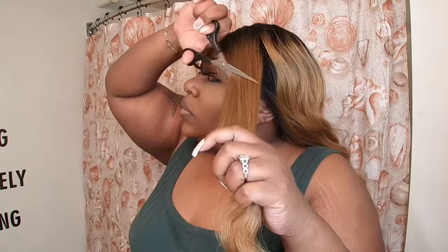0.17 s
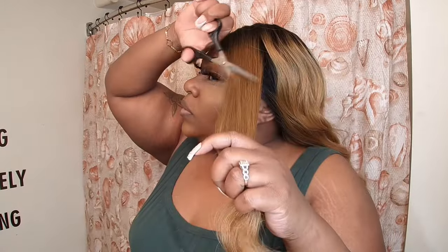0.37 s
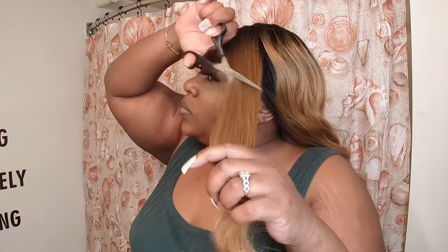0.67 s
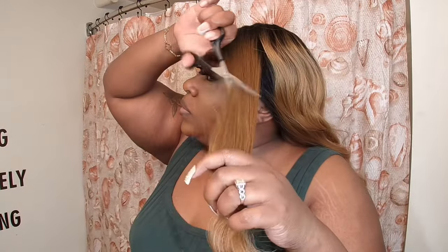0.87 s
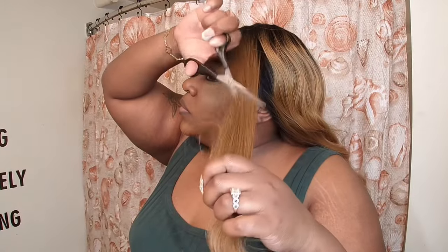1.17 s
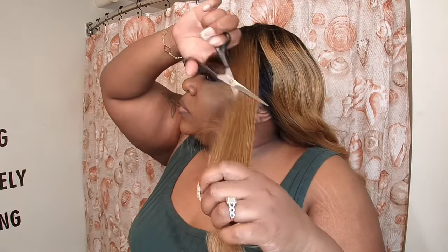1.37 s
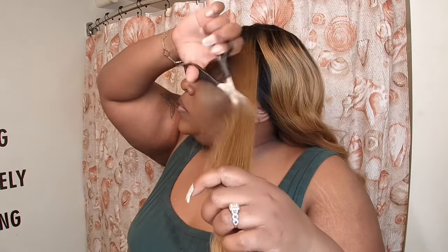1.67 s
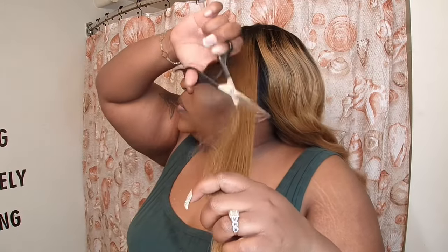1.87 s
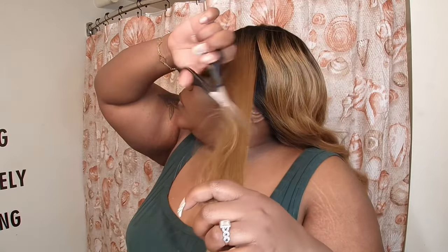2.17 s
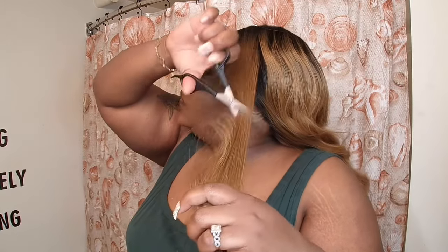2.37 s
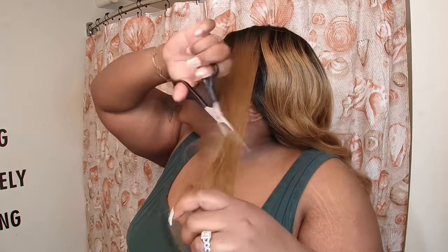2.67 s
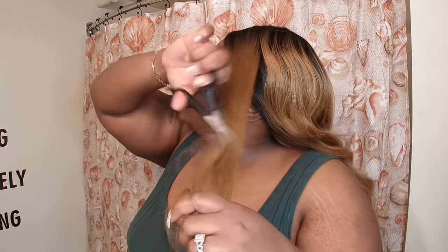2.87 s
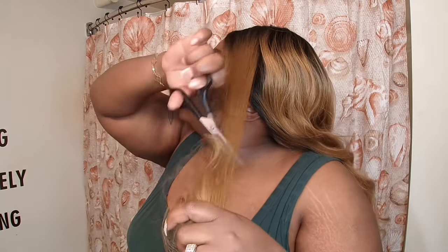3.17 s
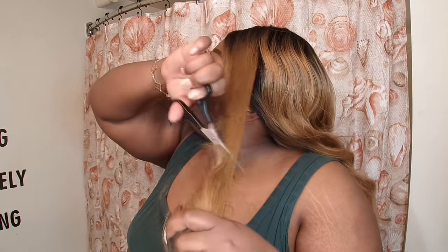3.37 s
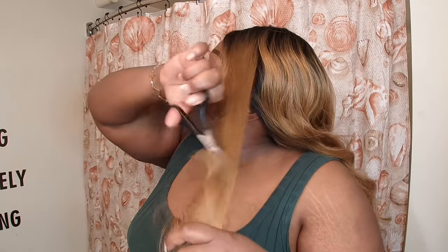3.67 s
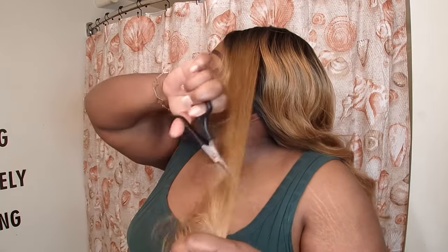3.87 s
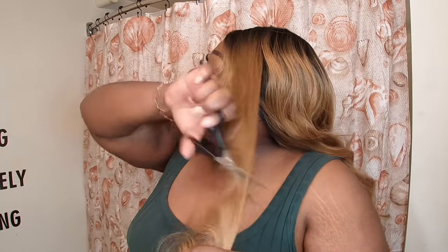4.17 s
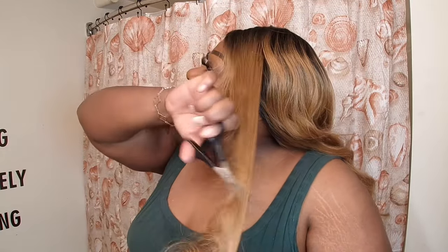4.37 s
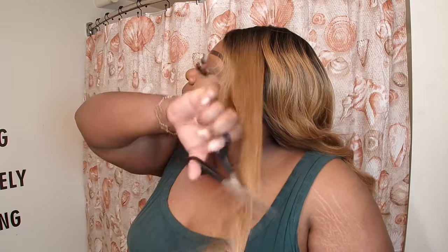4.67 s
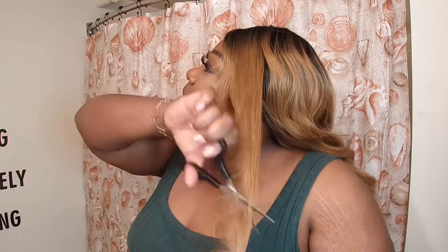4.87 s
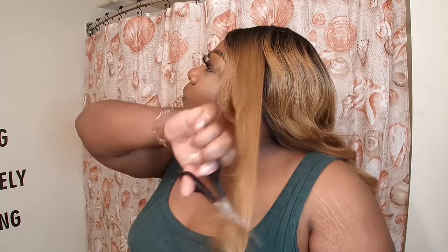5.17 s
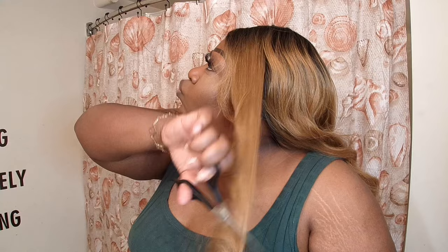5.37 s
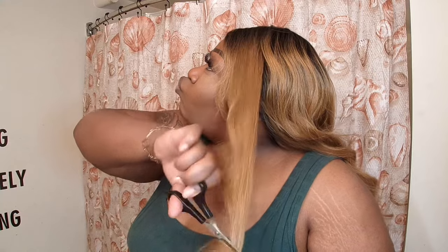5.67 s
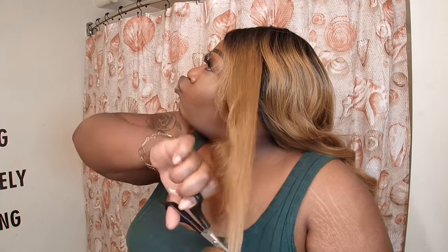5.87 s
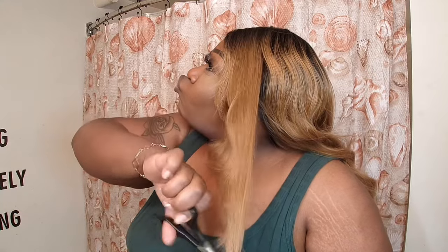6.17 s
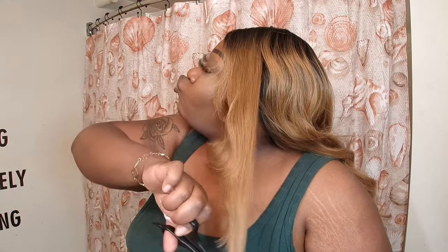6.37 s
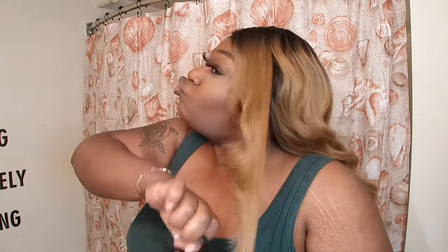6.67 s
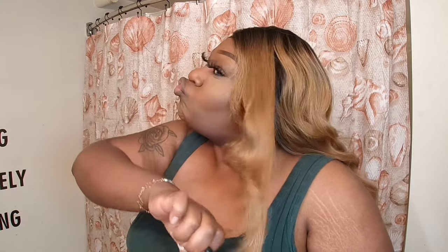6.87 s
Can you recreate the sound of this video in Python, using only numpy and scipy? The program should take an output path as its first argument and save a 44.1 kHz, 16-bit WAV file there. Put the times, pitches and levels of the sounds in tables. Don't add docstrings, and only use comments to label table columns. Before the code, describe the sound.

Close to the microphone in a small hard-walled bathroom, scissors cut down a hank of synthetic hair. From 0.2 s, light strokes come about every quarter second, each under a tenth of a second: a soft, bright, sizzling shear with thin steely ring around eight to nine kilohertz. The first are almost buried; by 2 s they are clear, and from 4 to 5.8 s crispest. At 5.87-5.95 s the blades snag with sharp ticks, a short scrape and a tiny squeak, while snipping continues. At 6.3-6.45 s comes the loudest, gritty rasp with low tugging body and squeaks; another catch and rasp follow at 6.53 s, then a swelling scrape with small squeaks from 6.65 to 6.85 s. A faint snip closes at 6.93 s. Steady microphone hiss, weak mains hum, a wavering low motor drone and barely audible distant thuds lie beneath.

```python
import sys
import numpy as np
from scipy import signal
from scipy.fft import rfft, irfft, next_fast_len
from scipy.io import wavfile

SR = 44100
rng = np.random.default_rng(int(sys.argv[2]) if len(sys.argv) > 2 else 0)


def undo_db(level):
    steps = np.asarray(level, float) / 20
    return 10 ** steps


def materialize(psi):
    bounded = np.clip(np.atleast_2d(psi).T, -1, 1)
    quanta = np.round(bounded * 32767).astype(np.int16)
    wavfile.write(sys.argv[1], SR, quanta)


N = 308848
TIME = np.arange(N) / SR

# frequency in Hz, density in dB per Hz.
HISS_SPECTRUM = [(21, -45), (35, -9), (73, -9), (88, -5), (108, -10.5), (129, -13), (184, -16.5),
                 (237, -17.5), (298, -19.5), (348, -20), (1150, -28), (3630, -36.5), (8880, -38),
                 (15600, -39)]
# frequency in Hz, level in dB rms.
MAINS_HARMONICS = [(60, -50.5), (180, -59), (300, -67)]
# start in seconds, frequency in Hz, level in dB, length in seconds.
FAR_THUDS = [
    (.31, 82, -45, .12),
    (2.83, 80, -44, .11),
    (4.49, 345, -63, .06),
    (4.86, 240, -60, .17),
    (4.83, 290, -62, .05),
    (5.89, 365, -57, .05),
]

# start in seconds, peak in dB, T60 in seconds.
CATCH_TICKS = [
    (5.63, -57, 0.023),
    (5.867, -41, 0.039),
    (5.895, -33, 0.038),
    (5.903, -22.5, 0.036),
    (6.301, -46, 0.046),
    (6.527, -33, 0.058),
]
# frequency in Hz, density in dB per Hz.
CATCH_SPECTRUM = [(250, -2.5), (500, 2), (1500, 0), (2200, 3), (3500, -29), (6000, -21), (9000, 5.5),
                  (12000, -19), (16000, -35)]

# start in seconds, length in seconds,
# first and last frequency in Hz, fundamental in dB.
SOFT_SLIPS = [(5.868, 0.017, 1750, 1810, -48), (5.904, 0.051, 1447, 1250, -41.5),
              (5.983, 0.044, 1300, 1352, -51.5), (6.479, .05, 1050, 920, -52.5),
              (6.309, 0.021, 1120, 1120, -48), (6.44, 0.043, 844, 770, -50.5),
              (6.667, 0.019, 1880, 1810, -38), (6.696, 0.031, 1400, 1310, -35.5)]
FIRM_SLIPS = [(6.303, 0.0052, 2180, 2100, -37.5), (6.54, 0.044, 1770, 1400, -50.5),
              (6.72, 0.016, 1680, 1690, -38), (6.737, 0.041, 1706, 1800, -38)]
HARD_SLIPS = [(6.324, 0.038, 1103, 1062, -43.5), (6.38, 0.04, 1103, 1064, -50.5),
              (6.59, 0.064, 1397, 1323, -63), (6.778, 0.0234, 1770, 1693, -54)]
# frequency in Hz, gain in dB.
SQUEAK_OVERTONES = [(1500, 3), (2500, 1), (3500, -2), (4500, 3.5), (5500, 0), (7000, 7.5), (8500, -11),
                    (10000, -17), (12000, -27)]

# top in seconds, level in dB,
# then attack, hold and release in seconds.
DRAG_STROKES = [(5.866, -44.5, .003, 0.011, .025), (5.903, -38.5, 0.02, 0.036, 0.058),
                (6.018, -51, .06, .005, .04), (6.302, -43, .005, .02, .02), (6.332, -30, 0.011, .01, .03),
                (6.347, -25.5, 0.02, 0.045, 0.06), (6.51, -51, .08, 0.0034, .01),
                (6.534, -32, 0.0087, 0.0057, .03), (6.549, -32, 0.044, .008, 0.096),
                (6.651, -35.5, 0.15, .003, 0.072), (6.74, -43, .05, 0.022, .05),
                (6.803, -38.5, 0.11, 0.022, .05)]
# top in seconds, level in dB, hold in seconds, hand relative in dB.
LOCK_TUGS = [(5.867, -53, .02, -26), (5.899, -39.5, .003, -6), (5.942, -52.5, 0.091, -8.5),
             (6.314, -38.5, 0.053, -15.5), (6.383, -40, 0.053, -8.5), (6.466, -50.5, 0.044, -3.5),
             (6.506, -41.5, .005, -20), (6.533, -43, .005, -34), (6.645, -48, 0.022, -33),
             (6.68, -43, .01, -16), (6.724, -52.5, 0.03, -6)]
# time in seconds, blades relative in dB.
BLADE_SLIDE = [
    (5.85, -16),
    (6.0, -13),
    (6.35, -42),
    (6.5, -25),
    (6.62, -7),
    (6.8, -17),
]
# frequency in Hz, density in dB per Hz.
RASP_SPECTRUM = [(1290, -27), (2200, -12), (2490, -11), (3230, -8.5), (3660, -13.5), (4290, -4.5),
                 (4970, -2.5), (5460, 2), (7960, 5.5), (10100, -0.5), (12500, -45), (16200, -55),
                 (22000, -120)]
EDGE_SPECTRUM = [(9000, -40), (11000, 7), (13000, -3), (15800, -11), (18000, -14)]
# frequency in Hz, width in Hz, level in dB.
LOCK_MODES = [(1050, 440, 1.5), (1400, 260, 8.5), (1970, 230, 4.5), (2760, 130, 2.5), (3460, 980, -11.5)]
HAND_MODES = [(348, 167, 0), (527, 185, 4), (773, 350, 3.5)]

# start in seconds, length in seconds, shear in dB, blade ring relative in dB.
SNIP_STROKES = [(0.188, 0.061, -67.5, -14.3), (0.45, 0.086, -66.5, -16), (0.708, 0.062, -64.5, -10),
                (0.94, 0.066, -61, -10), (1.18, 0.081, -58.5, -18), (1.422, 0.075, -56, -12.5),
                (1.657, 0.076, -55, -12), (1.902, 0.067, -53, -10.5), (2.137, 0.077, -54, -12),
                (2.376, 0.081, -53.5, -9.5), (2.612, 0.076, -54, -10.5), (2.837, 0.074, -54, -8.5),
                (3.073, 0.076, -54.5, -5), (3.318, 0.071, -52, -6), (3.544, 0.084, -53, -7),
                (3.78, 0.074, -52, -3.5), (4.016, 0.069, -50.5, -7.5), (4.246, 0.064, -52.2, -8),
                (4.472, 0.073, -49.5, -8), (4.7, 0.08, -49.5, -10), (4.93, 0.076, -50, -10.5),
                (5.156, 0.074, -48.5, -10), (5.385, 0.069, -50.5, -9), (5.623, 0.053, -48.5, -7.5),
                (5.837, 0.071, -49, -7.5), (6.062, 0.055, -49, -9), (6.281, 0.044, -48, -16),
                (6.925, 0.059, -58.5, -12)]
# time in seconds, heel and tip relative in dB.
CUT_PLACE = [
    (0, 4, -14),
    (1.5, -2, -24),
    (3, 0, -6),
    (4.6, -4, -11),
    (5.5, -10.5, -10),
    (7, -5, -18),
]
# frequency in Hz, width in Hz, level in dB.
BLADE_MODES = [(7800, 420, -9), (8050, 260, 13.5), (8156, 560, 16.5), (8560, 120, -16), (9060, 520, 16),
               (9680, 400, -8)]
RING_MODES = [(2230, 1430, -2.5), (2640, 300, 6), (3920, 5900, -24.5)]
HEEL_MODES = [(6410, 450, -3.5), (6800, 320, 3), (6990, 230, -16), (5320, 1150, -8)]
TIP_MODES = [(9330, 360, 10), (10550, 1300, 2), (11300, 1000, -17), (12600, 2900, 2)]
HANDLE_MODES = [(1315, 240, 1.5), (694, 57, 6.5)]
# frequency in Hz, density in dB per Hz.
SHEAR_SPECTRUM = [(1500, -35), (3000, -8.5), (5000, -5), (6500, -4.5), (8700, 7.5), (10200, -24),
                  (12000, -6), (14000, -27), (16000, -22)]


def rms_one(x):
    return x / np.sqrt(np.mean(x ** 2) + 1e-20)


def at_hz(points, hz):
    point_hz, point_db = np.array(points)[:, 0], np.array(points)[:, 1]
    return np.interp(np.log(hz + 1), np.log(point_hz), point_db)


def colour(x, points):
    size = next_fast_len(N)
    gain = undo_db(at_hz(points, np.fft.rfftfreq(size, 1 / SR)))
    return rms_one(irfft(rfft(x, size) * gain, size)[:N])


def drift(rate_hz):
    r = np.exp(-40 * np.pi * rate_hz / SR)
    noise = rng.standard_normal(N // 20 + 2002)
    slow = signal.lfilter([1], [1, -2 * r, r * r], noise)[2000:]
    return np.interp(np.arange(N) / 20, np.arange(len(slow)), rms_one(slow))


def resonate(x, modes, patchy_db=0):
    out = 0
    for k, (hz, width, db) in enumerate(modes):
        r = np.exp(-np.pi * width / SR)
        poles = [1, -2 * r * np.cos(2 * np.pi * hz / SR), r * r]
        rung = signal.lfilter([(1 - r * r) / 2, 0, (r * r - 1) / 2], poles, x)
        out = out + (-1) ** k * undo_db(db + patchy_db * drift(6.9)) * rung
    return out


def fibres(per_s, spread_db):
    sizes = undo_db(spread_db * np.minimum(rng.exponential(1, N), 4)) * rng.standard_normal(N)
    return rms_one(sizes * (rng.random(N) < per_s / SR))


def hump(start, length, top):
    top = np.clip(top, .05, .95)
    corners = [start, start + top * length, start + length]
    return np.sin(np.pi / 2 * np.interp(TIME, corners, [0, 1, 0]))


def swell(top, db, attack, hold, release, sag_db):
    attack, hold, release = np.maximum([attack, hold, release], .001)
    low = db - sag_db * hold
    corners = [top - 3 * attack, top, top + hold, top + hold + 3 * release]
    return undo_db(2 * np.interp(TIME, corners, [db - 60, db, low, low - 60], left=-200, right=-200))


def air_hiss():
    hiss = colour(rng.standard_normal(N), HISS_SPECTRUM)
    above_rumble = signal.butter(2, 320, "high", fs=SR, output="sos")
    hiss = undo_db(-60.5) * hiss / np.std(signal.sosfilt(above_rumble, hiss))
    return hiss * undo_db(0.25 * drift(0.93))


def mains_hum():
    return sum(undo_db(db + 2) * np.sin(2 * np.pi * hz * TIME + 6 * rng.random())
               for hz, db in MAINS_HARMONICS)


def motor_drone():
    level = undo_db(-48 + 2.1 * drift(3.9))
    hz = 27.2 + 0.67 * drift(1.7)
    return level * np.sin(2 * np.pi * np.cumsum(hz) / SR)


def thuds():
    return sum(undo_db(db + 3.0) * hump(s, length, 0.33) * np.sin(2 * np.pi * hz * TIME)
               for s, hz, db, length in FAR_THUDS)


def background():
    return air_hiss() + mains_hum() + motor_drone() + thuds()


def bathroom(x):
    t60_s, tail_db = 0.19, -7
    t = np.arange(int(.4 * SR)) / SR
    dull_noise = signal.lfilter([1], [1, -.3], rng.standard_normal(len(t)))
    tail = dull_noise * undo_db(-60 * t / t60_s) * (t > .003)
    return undo_db(tail_db) * signal.fftconvolve(x, tail / np.sqrt(np.sum(tail ** 2)))[:N]


def ticks():
    burst = np.zeros(N)
    for s, db, t60 in CATCH_TICKS:
        age = TIME - s
        burst += undo_db(db - 10.5 - 60 * np.abs(age) / max(t60, .005)) * (age > 0)
    return burst * colour(fibres(14000, 1.3), CATCH_SPECTRUM)


def squeaks():
    out = np.zeros(N)
    shake, grip = .011 * drift(150), undo_db(3.0 * drift(150))
    multiple = np.arange(2, 12)[:, None]
    for slips, bite_db in ((SOFT_SLIPS, -23), (FIRM_SLIPS, -0.5), (HARD_SLIPS, 15.5)):
        for s, length, first_hz, last_hz, low_db in slips:
            on = slice(int(s * SR), int((s + length) * SR))
            hz = np.linspace(first_hz, last_hz, on.stop - on.start) * (1 + shake[on])
            phase = 2 * np.pi * np.cumsum(hz) / SR
            over_hz = multiple * hz
            effort_db = low_db + np.interp(over_hz, [1500, 5000], [0, bite_db])
            level = undo_db(effort_db - 8.0 + at_hz(SQUEAK_OVERTONES, over_hz)) * (over_hz < .4 * SR)
            overtones = level * np.cos(multiple * phase + 0.33 * multiple ** 2)
            fundamental = undo_db(low_db - 3.0) * np.sin(phase)
            envelope = hump(s, length, 0.48)[on] ** 0.33 * grip[on]
            out[on] += envelope * (fundamental + overtones.sum(axis=0))
    return out


def drags():
    rasp_sag, tug_sag = 102, 44
    tug_attack_s, tug_release_s = 0.009, 0.056
    drag = np.sqrt(sum(swell(*row, rasp_sag) for row in DRAG_STROKES))
    tugs = np.array([swell(s, db, tug_attack_s, hold, tug_release_s, tug_sag)
                     for s, db, hold, _ in LOCK_TUGS])
    lock = np.sqrt(tugs.sum(axis=0))
    hand = np.sqrt(undo_db(2 * np.array(LOCK_TUGS)[:, 3]) @ tugs)

    snaps = fibres(24000, 1.3) * undo_db(1.1 * drift(120))
    steel = [(hz, 140, .1) for hz in np.geomspace(2400, 11500, num=16)]
    streaks = resonate(snaps, steel, 3.5)
    rasp = rms_one(colour(snaps, RASP_SPECTRUM) + undo_db(-24.0) * colour(streaks, RASP_SPECTRUM))
    slide = undo_db(np.interp(TIME, *np.transpose(BLADE_SLIDE)))
    blades = slide * rms_one(resonate(snaps, BLADE_MODES))
    lock_body = rms_one(resonate(snaps, LOCK_MODES, 3.5))
    hand_body = rms_one(resonate(resonate(snaps, HAND_MODES), HAND_MODES))
    edge = colour(snaps, EDGE_SPECTRUM)
    return (undo_db(-1.5) * drag * (rasp + blades) + undo_db(-4.0) * lock * lock_body
            + undo_db(-0.5) * hand * hand_body + undo_db(-22) * drag * edge)


def snips():
    usual_shear_db, handle_db = -55.5, -63.5
    heel_lead_s = 0.0054
    shear, ring, handle = np.zeros((3, N))
    for s, length, db, ring_db in SNIP_STROKES:
        stroke = undo_db(-1.84) * hump(s - 0.46 * length, 1.867 * length, 0.51) ** 2.4
        shear += stroke * undo_db(db)
        ring += stroke ** 1.46 * undo_db(db + ring_db + 1.5)
        handle += stroke * undo_db(handle_db + 0.083 * (db - usual_shear_db))
    s, heel_db, tip_db = np.transpose(CUT_PLACE)
    early = np.roll(shear, -int(heel_lead_s * SR))
    heel = early * undo_db(np.interp(TIME, s, heel_db))
    tip = shear * undo_db(np.interp(TIME, s, tip_db))

    snaps = fibres(18000, 1.4)
    parts = ((shear, BLADE_MODES), (heel, HEEL_MODES), (tip, TIP_MODES),
             (ring, RING_MODES), (handle, HANDLE_MODES))
    rung = sum(gain * rms_one(resonate(snaps, body, 1.8)) for gain, body in parts)
    direct = shear * colour(snaps, SHEAR_SPECTRUM)
    return undo_db(-2.5) * rung + undo_db(-7.5) * direct


def scene():
    scissors = snips() + drags() + squeaks() + ticks()
    return (scissors + bathroom(scissors) + background())[None]


def roll_off(x):
    return signal.sosfilt(signal.butter(12, 15710, fs=SR, output="sos"), x)


def record(dry):
    low_pass = signal.ellip(10, .3, 60, 15750, fs=SR, output="sos")
    mix = signal.sosfilt(low_pass, dry)
    return roll_off(mix)


dry = scene()
out = record(dry)
materialize(out)
```